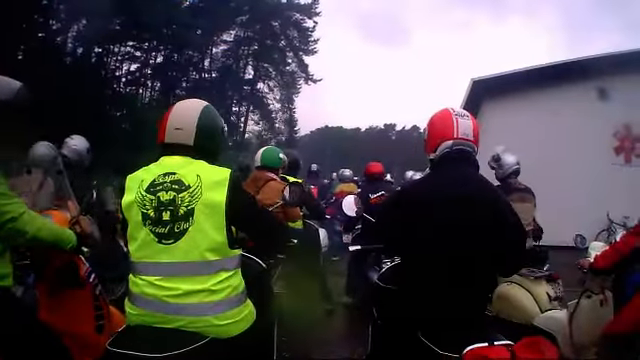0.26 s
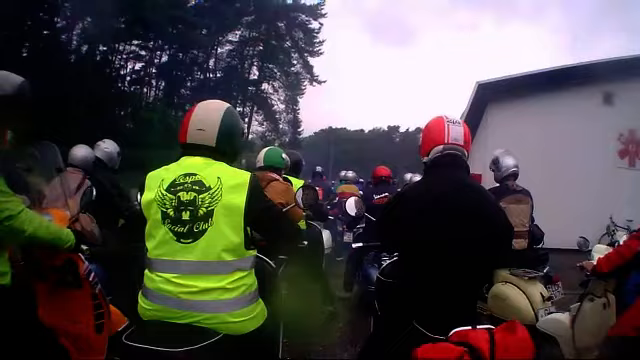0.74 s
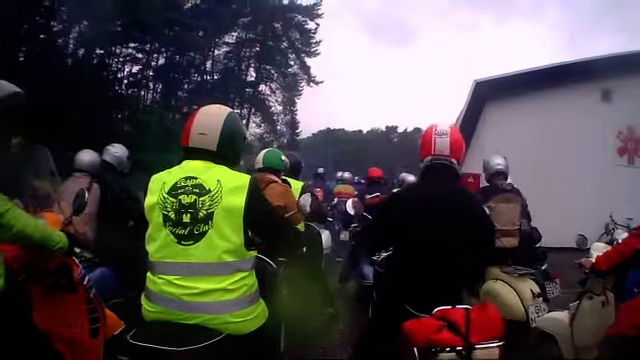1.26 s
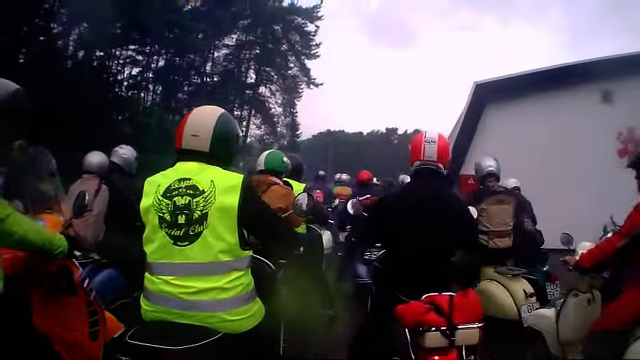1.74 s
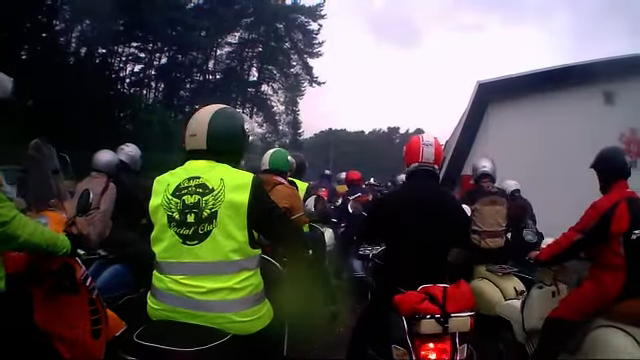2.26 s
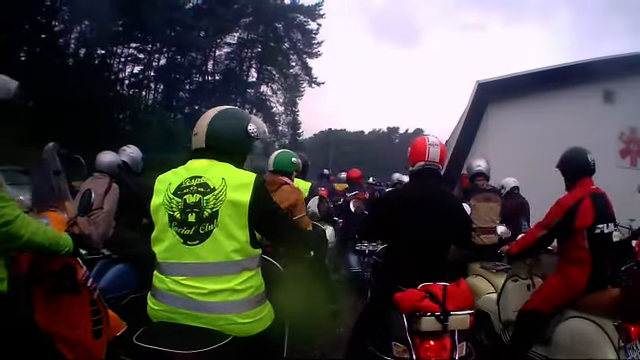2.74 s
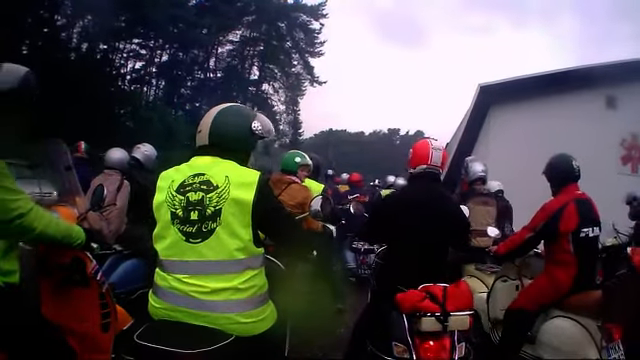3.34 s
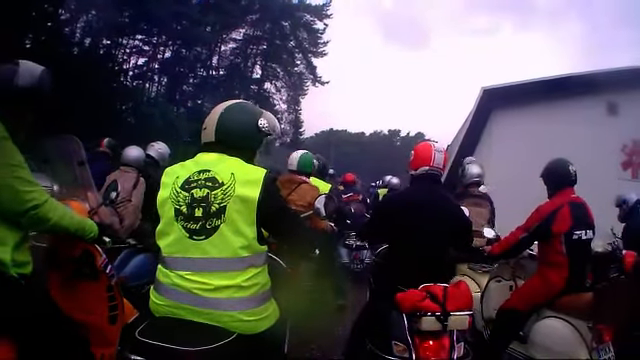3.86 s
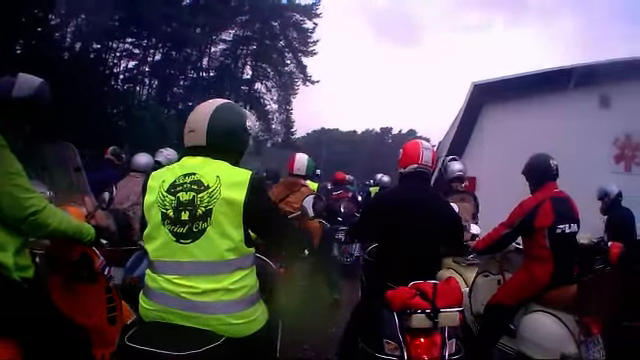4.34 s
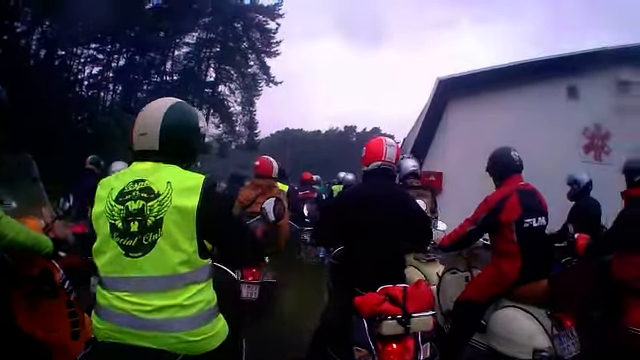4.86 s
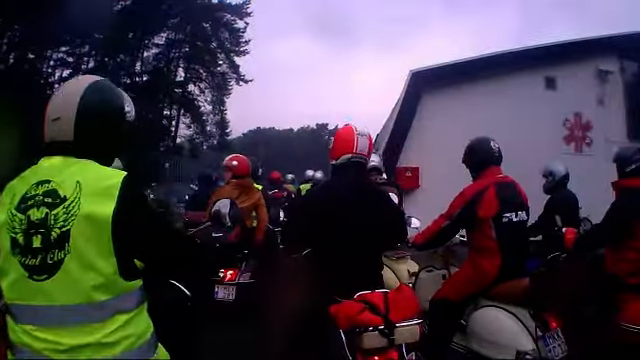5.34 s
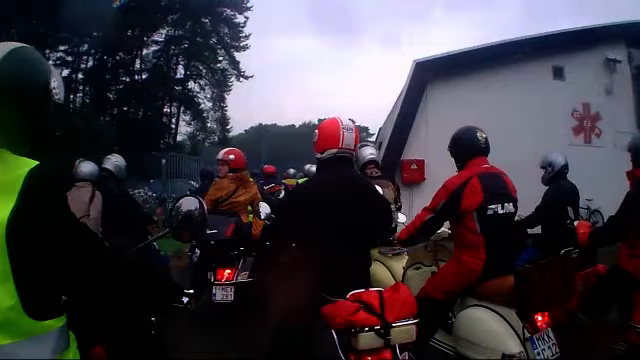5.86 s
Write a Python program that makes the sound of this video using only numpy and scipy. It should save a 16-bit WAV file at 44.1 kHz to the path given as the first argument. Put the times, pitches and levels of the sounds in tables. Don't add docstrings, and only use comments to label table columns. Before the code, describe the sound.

Outdoors among queued two-stroke scooters, a low engine throb and soft distant rumble continue throughout. A loose plastic mount chatters rapidly against the microphone. Hard, bright knocks cluster around two seconds, loud enough to distort; lighter taps follow. Near four and a half seconds the throttle opens, the engine climbs, slips and falls back amid dense rattling. The sound is boxy and lacks treble.

```python
import sys
import numpy as np
from scipy import signal
from scipy.fft import rfft, irfft
from scipy.io import wavfile
from scipy.ndimage import uniform_filter1d

SR = 44100
rng = np.random.default_rng(int(sys.argv[2]) if len(sys.argv) > 2 else 0)


def output_pcm(signal):
    pcm = np.clip(np.atleast_2d(signal).T, -1, 1) * 32767
    wavfile.write(sys.argv[1], SR, np.round(pcm).astype(np.int16))


def convert_level_to_amplitude(level_db):
    exponent = np.asarray(level_db, float) / 20
    return 10 ** exponent


N = 269010

# (time [s], turn rate [Hz], level [dB])
CRANK = [(0.0, 44.71, -33), (0.37, 46.63, -41), (0.75, 47.25, -37.5), (1.87, 45.97, -41),
         (2.0, 45.24, -52.5), (2.23, 45.42, -33.5), (3.3, 45.24, -30.5), (3.45, 43.79, -34),
         (3.94, 43.59, -32.5), (4.43, 45.14, -32.5), (4.56, 52.88, -25.5), (4.78, 63.96, -31.5),
         (5.06, 68, -28), (5.25, 61.32, -30.5), (5.45, 48.21, -24), (5.69, 39.75, -33.5),
         (5.76, 47.58, -31), (5.95, 39.27, -38.5)]
# (time [s], width [s], level change [dB])
CLUTCH_SLIPS = [
    (4.765, .025, -15.5),
    (5.31, .03, -18),
    (5.72, .02, -6),
]
# (time [s], level [dB])
REV = [
    (4.5, -68),
    (4.62, -42.5),
    (4.76, -38),
    (4.9, -32.5),
    (5.12, -32.5),
    (5.2, -50),
    (5.42, -38.5),
    (5.65, -47.5),
    (5.72, -68.5),
]
# (order [per turn], level [dB])
REV_ORDERS = [(.5, -9), (1.5, -24.5), (2, 2), (2.5, -2.5), (3.5, -10), (4, -10.5)]
# (start [s], length [s], level change [dB])
GRIPS = [
    (2.234, 0.034, -6.5),
    (2.288, .05, -14),
    (3.508, 0.035, -8.5),
    (5.278, 0.064, -3.5),
    (2.591, 0.31, -6.5),
    (3.972, 0.32, -22),
    (4.745, .2, -10.5),
    (5.126, 0.25, -7.5),
    (5.682, 0.26, -13),
]
# (time [s], chatter level [dB])
CHATTER = [(0.0, -35.5), (0.3, -43.5), (0.75, -36.5), (1.55, -50.5), (2.05, -51), (2.2, -30.5), (2.54, -31),
           (2.95, -29.5), (3.41, -35), (3.97, -33), (4.39, -29.5), (4.49, -31), (4.67, -29.5), (5.0, -29),
           (5.33, -31), (5.5, -23), (5.92, -32), (6.1, -46.5)]
# (frequency [Hz], width [Hz], level [dB])
CASE_LOW = [(646, 900, -25.5), (761.6, 77.6, 17.5), (913, 25.8, 9)]
# (frequency [Hz], width [Hz], level [dB])
CASE_HIGH = [(1137, 46, -10), (1532, 62, 0.5), (1750, 34, 1.5), (2204, 280, 1.5), (2468, 80, -1.5),
             (2782, 40, -10.5), (3350, 1000, -23)]
# (frequency [Hz], density [dB per Hz])
QUEUE = [(15, -40.5), (25, -9), (58, -4), (92, -13), (168, -21.5), (244, -16.5), (294, -20.5), (658, -10.5),
         (793, -8), (1200, -28.5), (1780, -22), (2190, -32.5), (2800, -28), (3520, -28), (4580, -55.5),
         (7740, -120)]
# (time [s], level [dB])
EXHAUST = [(0.05, -34.5), (0.3, -50), (0.6, -33.5), (0.85, -34.5), (1.05, -55.5), (1.87, -66.5),
           (2.38, -40.5), (2.8, -38), (3.19, -38), (3.9, -40), (4.3, -52.5), (4.55, -29), (4.66, -27),
           (4.77, -42), (5.27, -59), (5.4, -24.5), (5.54, -22), (5.68, -37.5)]
# (frequency [Hz], width [Hz], level [dB])
PIPE = [(152, 38, -1), (178.4, 43.4, -1), (258, 73, -23)]
# (time [s], peak [dB], bright part [dB], frame thump [dB])
TAPS = [(0.085, -20, -18, -26.5), (0.147, -19, -6, -22), (0.242, -20, -16, -26), (0.319, -22, -12, -54),
        (0.554, -15.5, -4.5, -23), (0.794, -22, -1, -23), (1.003, -18, -26, -21.5), (1.136, -21.5, 0, -41),
        (1.3, -15.5, -4, -39), (1.347, -12, -9.5, -32.5), (1.368, -19, -3.5, -35), (2.188, -12, 12, -25.5),
        (2.257, -11, 1.5, -48), (2.397, -6, 0.5, -49), (2.758, -13.5, 1, -39), (2.866, -10.5, 4.5, -26),
        (2.956, -21.5, -13, -30.5), (3.002, -25, -9, -25.5), (3.066, -15, -4, -42),
        (3.091, -18.5, -8, -39.5), (3.171, -13, -15, -29), (3.249, -10.5, -6, -41), (3.27, -15.5, 2.5, -36),
        (3.544, -13.5, 2, -42), (4.264, -14, -10, -25), (4.347, -12.5, 2.5, -31), (4.383, -5, -7.5, -14.5),
        (4.41, -14.5, 6.5, -23.5), (4.595, -2.5, -7.5, -28.5), (4.614, -3.5, -2.5, -32)]
# (time [s], peak [dB])
TOUCHES = [(0.489, -18), (0.847, -30), (1.081, -22.5), (1.159, -22), (1.39, -21.5), (1.556, -23),
           (1.568, -19), (1.598, -23), (1.661, -19), (1.694, -23), (2.046, -14.5), (2.574, -30.5),
           (2.694, -14.5), (2.734, -48), (3.328, -11.5), (3.406, -29.5), (3.634, -13.5), (3.659, -15.5),
           (3.708, -21.5), (3.741, -15), (3.815, -27.5), (3.86, -13.5), (4.052, -23.5), (4.164, -19),
           (4.466, -50), (4.526, -29.5), (4.644, -10), (5.77, -11), (5.886, -19), (6.055, -18.5)]
# (first [s], last [s], gap [s], peak [dB], bright part
# [dB])
RUNS = [(0.502, 0.938, .062, -13.5, -12), (2.314, 2.524, .066, -9, 0), (4.835, 4.909, .033, -16, -19),
        (4.96, 5.025, .032, -10, 0), (5.05, 5.142, .031, -7.5, -3), (5.324, 5.376, .0265, -12, -10),
        (5.421, 5.46, .041, -8.5, -10), (5.497, 5.523, .022, -4, -10), (0.563, 0.579, .006, -14.5, -11.5),
        (2.333, 2.344, .013, -14, -2.5), (5.55, 5.59, .0195, -3, 1), (5.614, 5.69, .0253, -7, 0)]
# (time [s], peak [dB], bright part [dB], frame thump [dB], strongest spot mode [Hz])
KNOCKS = [(0.708, -14, -14.5, -28.5, 1135), (0.895, -8, -2.5, -61, 1160), (1.026, -17, -6.5, -47, 1146),
          (1.201, -14.5, -2.5, -28, 1780), (1.329, 0, -3, -34.5, 1420), (1.330, -3.5, -23.5, -28, 517),
          (1.459, 5.5, 9.5, -55, 1662), (1.629, -6.5, 7, -40, 1800), (1.894, -15.5, 1, -30.5, 1650),
          (2.003, -1, 18, -28.5, 1763), (2.014, 13.5, 15, -23, 1710), (2.088, -2, -0.5, -29.5, 1190),
          (2.138, -13, 3, -52, 1022), (2.201, 12.5, 13, -31, 1863), (2.267, 12, 11, -47, 1750),
          (2.794, -5, 2, -28.5, 1940), (3.553, -2.5, 5, -34, 1980), (4.214, -10, 7.5, -28, 2060),
          (4.58, 4, 0.5, -13, 1770), (4.688, -4, -2.5, -24, 1895), (5.442, 3.5, 14, -17.5, 2657),
          (5.479, 1, -9.5, -11, 1870), (5.542, 0.5, 2, -28, 1155), (5.801, -5.5, -22, -30, 730)]

THIRD_DB, THIRD_WAVER_DB = -10, 3.5
THIRD_GROWTH_DB_PER_DB = 1.7
GRIP_ON_THROB = .3
GRIP_RISE_S = 0.0041
CHATTER_BRIGHT_DB = 3
FAR_IDLE_HZ, FAR_IDLE_DB = 33.5, -45
QUEUE_DB = -40.5
USUAL_SPOT_HZ = 1830
TOUCH_BRIGHT_DB = -5
TOUCH_THUMP_DB, RUN_THUMP_DB = -25, -19
DULL_THUMP_DB_PER_DB = 0.62
CONTACT_RISE_S, AFTER_RING_S = 0.00083, 0.016
CHOKE_S, AFTER_RING_SHARE = .0035, 0.59
FLIGHT_S, FLIGHT_DB = .012, -2.5
BAND_EDGE_HZ = 3710


def evened(x):
    return x / np.sqrt(np.mean(x ** 2) + 1e-20)


def steady(x, span_s):
    return x / np.sqrt(abs(uniform_filter1d(x ** 2, int(span_s * SR))) + 1e-9)


def curves(rows):
    time_s, *columns = np.transpose(rows)
    return [np.interp(np.arange(N) / SR, time_s, column) for column in columns]


def slow(span_s):
    size = int(span_s * SR)
    return evened(uniform_filter1d(uniform_filter1d(rng.standard_normal(N), size), size))


def ring(modes, detune, spread_db):
    hz, width_hz, db = np.transpose(modes)[:, :, None]
    chance = rng.standard_normal((2, len(modes), 1))
    t = np.arange(2048) / SR
    sines = np.sin(2 * np.pi * hz * (1 + detune * chance[0]) * t) * np.exp(-np.pi * width_hz * t)
    sound = (convert_level_to_amplitude(db + spread_db * chance[1]) * sines).sum(0)
    return sound / abs(sound).max()


def struck(blows, modes, detune, spread_db, count=8):
    spot = rng.integers(0, count, N)
    return sum(signal.oaconvolve(blows * (spot == k), ring(modes, detune, spread_db))[:N]
               for k in range(count))


def thin(x):
    return signal.sosfilt(signal.butter(4, 490, "high", fs=SR, output="sos"), x)


def grip_db():
    t = np.arange(N) / SR
    damping_db = np.zeros(N)
    for start_s, length_s, db in GRIPS:
        closing = np.clip((t - start_s) / GRIP_RISE_S, 0, 1)
        release = np.clip(1 - ((t - start_s) / length_s) ** 2, 0, 1)
        damping_db += db * closing * release
    return damping_db


def blows_listed():
    rows = KNOCKS + [(*row, USUAL_SPOT_HZ) for row in TAPS]
    rows += [(s, db, TOUCH_BRIGHT_DB, db + TOUCH_THUMP_DB, USUAL_SPOT_HZ) for s, db in TOUCHES]
    for first_s, last_s, gap_s, db, bright_db in RUNS:
        thump_db = db + RUN_THUMP_DB - DULL_THUMP_DB_PER_DB * bright_db
        times_s = np.linspace(first_s, last_s, round((last_s - first_s) / gap_s) + 1)
        rows += [(s, db, bright_db, thump_db, USUAL_SPOT_HZ) for s in times_s]
    return rows


def settling_db(depth_db, span_s):
    t = np.arange(N) / SR
    at = np.sort([0, 2 * N / SR] + [row[0] for row in blows_listed()])
    following = np.searchsorted(at, t, "right")
    flight = np.exp(-((at[following] - t) / FLIGHT_S) ** 2)
    loose = np.exp(-(t - at[following - 1]) / span_s) - .4
    return uniform_filter1d(depth_db * loose + FLIGHT_DB * flight, 88)


def throb(turns):
    t = np.arange(N) / SR
    first_db = curves(CRANK)[1] + GRIP_ON_THROB * grip_db()
    for s, width_s, db in CLUTCH_SLIPS:
        first_db = first_db + db * np.exp(-((t - s) / width_s) ** 2)
    loss_db = THIRD_GROWTH_DB_PER_DB * np.clip(first_db + 31, -20, 0)
    third_db = first_db + THIRD_DB + loss_db + THIRD_WAVER_DB * slow(0.044)
    idle = sum(convert_level_to_amplitude(db + .8 * slow(.02)) * np.sin(2 * np.pi * order * turns)
               for order, db in ((1, first_db), (3, third_db)))
    rev = sum(convert_level_to_amplitude(db + 0.63 * slow(0.011)) * np.sin(2 * np.pi * (order * turns + rng.random()))
              for order, db in REV_ORDERS)
    return np.sqrt(2) * (idle + convert_level_to_amplitude(curves(REV)[0]) * rev)


def chatter(turns):
    level_db = curves(CHATTER)[0] + grip_db()
    swings = np.diff(np.floor(2 * turns + .06 * slow(.004)), prepend=0) > 0
    slips = rng.random(N) < 70 / SR
    size = convert_level_to_amplitude(5 * np.clip(rng.standard_normal(N), -3, 1.1)) * rng.choice([-1, 1], N)
    blows = size * (swings + .5 * slips)
    bounces = 0.49 * np.roll(blows, 45) - .5 * np.roll(blows, 120) + 0.18 * np.roll(blows, 215)
    soft = signal.butter(2, 3200, fs=SR, output="sos")
    blows = signal.sosfilt(soft, blows + bounces)
    hollow = steady(thin(struck(blows, CASE_LOW, .025, 3.0)), .15)
    stiff = steady(thin(struck(blows, CASE_HIGH, .035, 4.0)), .15)
    level = convert_level_to_amplitude(level_db + 3.5 + settling_db(6.9, 0.034))
    return level * (hollow + convert_level_to_amplitude(CHATTER_BRIGHT_DB - 6.5) * stiff)


def neighbour():
    turns = np.cumsum(FAR_IDLE_HZ * (1 + 0.033 * slow(0.26))) / SR
    return convert_level_to_amplitude(FAR_IDLE_DB + 2.7 * slow(.08)) * np.sin(2 * np.pi * turns)


def queue():
    f, db = np.transpose(QUEUE)
    hz = np.fft.rfftfreq(N, 1 / SR)
    shape = convert_level_to_amplitude(np.interp(np.log(hz + 1), np.log(f), db))
    noise = irfft(rfft(rng.standard_normal(N)) * shape, N)
    return convert_level_to_amplitude(QUEUE_DB + 3.0 * slow(0.099)) * evened(noise)


def exhaust(turns):
    fired = np.diff(np.floor(turns + .09 * slow(.01)), prepend=0) > 0
    size = convert_level_to_amplitude(3.5 * np.clip(rng.standard_normal(N), -3, 1.5))
    puffs = steady(struck(-size * fired, PIPE, .05, 12.0, count=4), 0.18)
    return convert_level_to_amplitude(curves(EXHAUST)[0] - 0.26 + settling_db(4.7, 0.031)) * puffs


def knocks():
    case, frame = np.zeros((2, N + 4096))
    thump = ring(PIPE, .01, .4)
    for s, peak_db, bright_db, thump_db, spot_hz in blows_listed():
        bright = min(convert_level_to_amplitude(bright_db), .98)
        contacts = np.zeros(400)
        strength = rng.uniform([.8, .5, .4, .3, .2], 1) * [1, 1, .9, .7, .5]
        contacts[[0, 30, 75, 130, 230]] = strength * rng.choice([-1, 1], 5)
        spot = .8 * ring([(spot_hz, min(260, spot_hz / 5), 0)], 0, 0)
        stiff = ring(CASE_HIGH, .04, 3.5) + spot / (bright if spot_hz < 1000 else 1)
        hollow = 1.21 * np.sqrt(1 - bright ** 2) * ring(CASE_LOW, 0.027, 10.0)
        sound = np.convolve(bright * stiff + hollow, contacts)
        t = np.arange(len(sound)) / SR
        choked = (1 - AFTER_RING_SHARE) * np.exp(-(t / CHOKE_S) ** 2)
        remainder = AFTER_RING_SHARE * np.exp(-t / AFTER_RING_S)
        sound = sound * np.minimum(t / CONTACT_RISE_S, 1) * (remainder + choked)
        at = round(s * SR)
        case[at:at + len(sound)] += convert_level_to_amplitude(min(peak_db + 0.5, 8)) * sound / abs(sound).max()
        frame[at + 60:at + 2108] -= convert_level_to_amplitude(thump_db + 2) * thump
    return (thin(case) + frame)[:N]


def scene():
    turns = np.cumsum(curves(CRANK)[0]) / SR
    mix = throb(turns) + chatter(turns) + neighbour() + queue() + exhaust(turns) + knocks()
    return mix[None]


def top_cut(x):
    return signal.sosfilt(signal.butter(12, 11300, fs=SR, output="sos"), x)


def record(dry):
    edge = signal.firwin(401, BAND_EDGE_HZ, window=("kaiser", 12), fs=SR)
    band = signal.oaconvolve(dry, edge[None], "same")
    return top_cut(np.clip(band, -1, 1))


dry = scene()
out = record(dry)
output_pcm(out)
```